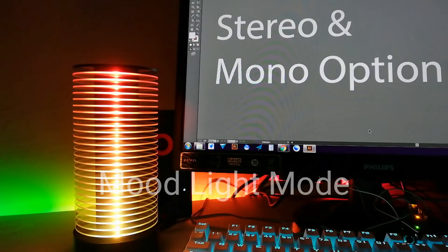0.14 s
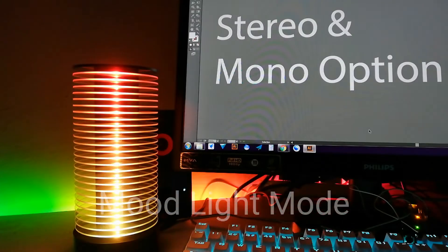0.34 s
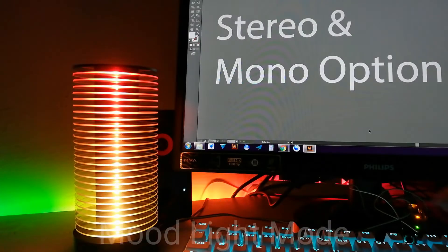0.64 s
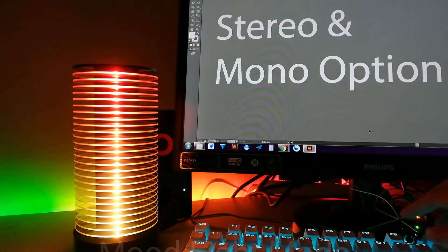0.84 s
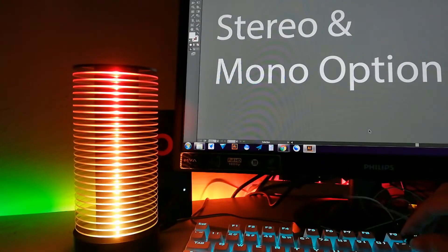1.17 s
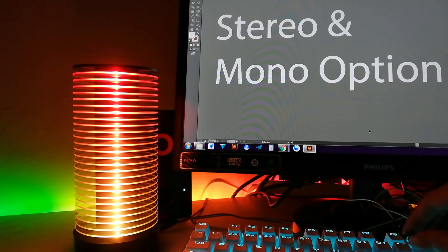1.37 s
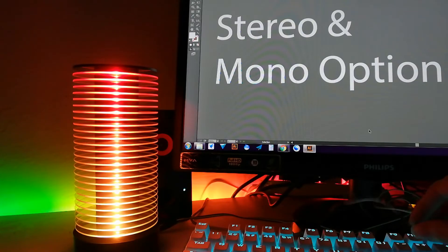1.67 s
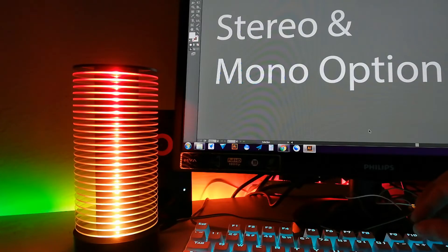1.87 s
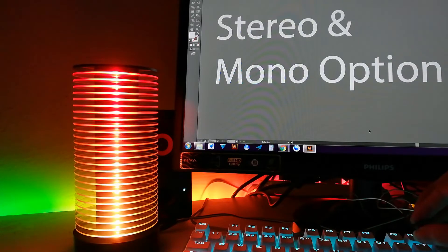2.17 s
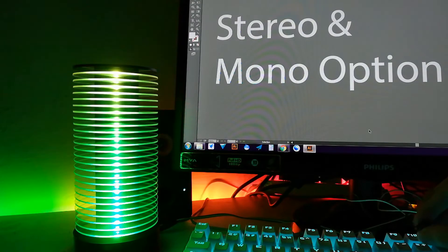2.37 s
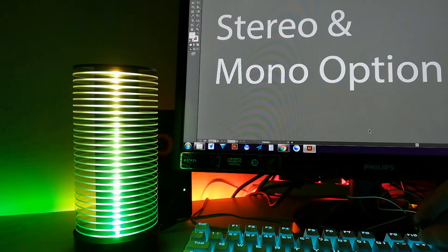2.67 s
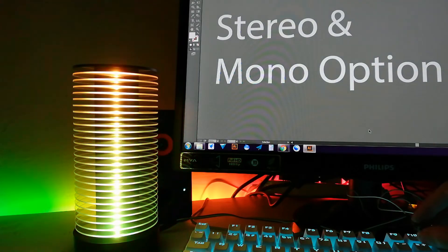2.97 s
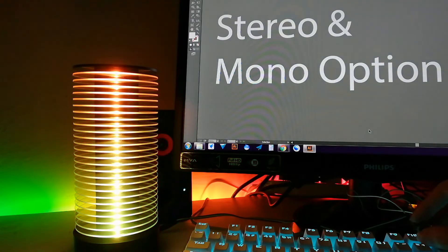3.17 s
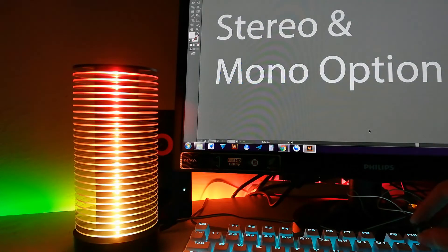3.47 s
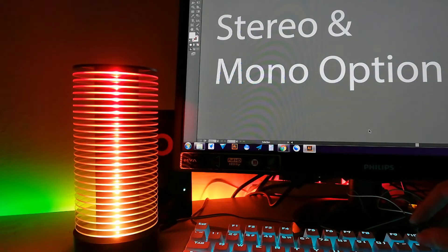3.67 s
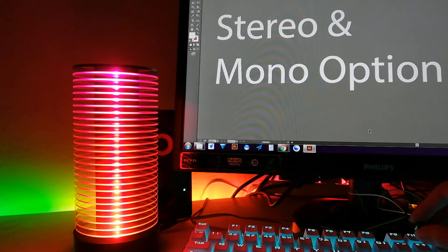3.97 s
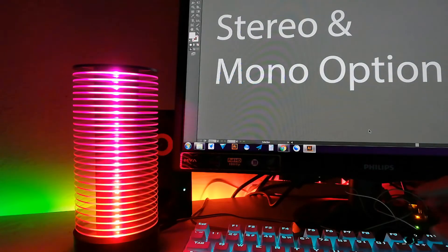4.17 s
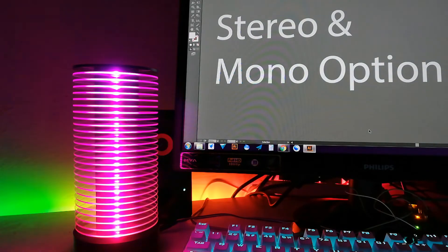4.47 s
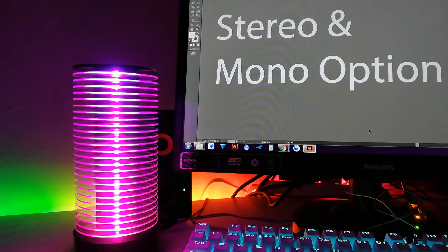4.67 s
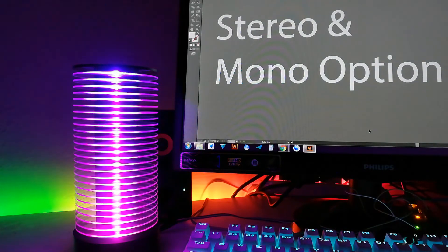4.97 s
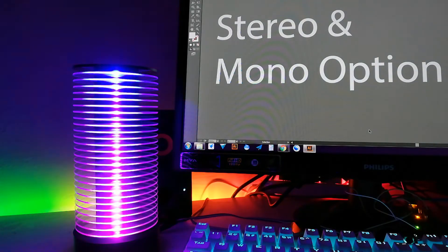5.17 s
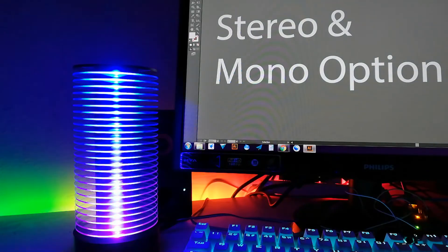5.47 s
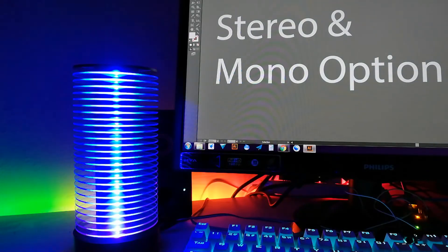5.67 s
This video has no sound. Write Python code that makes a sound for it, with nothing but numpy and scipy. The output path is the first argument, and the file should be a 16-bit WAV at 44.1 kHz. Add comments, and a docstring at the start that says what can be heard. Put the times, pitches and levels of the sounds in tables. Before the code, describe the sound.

Quiet desk room with soft hiss and faint mains hum; a deep drone swells and sinks as small switches click, then a soft scrape and knock.

```python
"""Soft hiss comes first, with room rumble and a faint mains hum: a quiet room at night, near a desk, in spaced microphones.
A deep drone, perhaps a vehicle outside, swells and sinks: one gliding sine. A finger slides over plastic (grainy noise)
and a hand clicks small switches on the desk (ringing springs and housings); one dull pop is a step that sags back.
Near the end furniture scrapes softly (chattering tones and friction noise) and a knock follows (ringing desk modes).
Echoes and a short room tail surround the finger, the switches and the raps of the knock."""
import sys
import numpy as np
from scipy import signal
from scipy.fft import rfft, irfft
from scipy.io import wavfile
from scipy.ndimage import uniform_filter1d

SR = 44100
rng = np.random.default_rng(int(sys.argv[2]) if len(sys.argv) > 2 else 0)


def master_out(mix):
    """Clip the mix to full scale and print it as 16-bit PCM to the path in sys.argv[1]."""
    frames = np.transpose(np.atleast_2d(mix))
    ceiling = np.clip(frames, -1, 1)
    pcm = np.round(ceiling * 32767).astype(np.int16)
    wavfile.write(sys.argv[1], SR, pcm)


N = 257544  # length in samples

# Spectrum shape of room air and microphone hiss: pitch_hz, relative level_db
AIR_SPECTRUM = [(20, -42), (32, -8), (40, -2), (60, -5.5), (80, 1.5), (100, -16.5), (128, -11.5),
                (150, -16.5), (278, -19), (432, -27), (2140, -38.5), (10300, -46), (14700, -50),
                (16000, -58)]
AIR_RMS_DB = -51  # mean of the two microphones
# Likeness of the air at the two microphones: pitch_hz, likeness (-1 to 1)
AIR_LIKENESS = [(60, 0.99), (92, 1), (140, 0.94), (210, 0.91), (330, 0.65), (500, -0.11), (770, -0.44),
                (1170, 0.28), (1790, -0.065), (2740, -0.1), (4190, -0.093), (6410, -0.24), (9810, 0.074),
                (15000, -0.08)]
# Balance of the air: pitch_hz, left_minus_right_db
AIR_BALANCE = [(100, 0), (300, 0), (900, -2.5), (3000, -0.2), (8000, 0)]
# Standing waves stirred by the rumble: pitch_hz, width_hz of each of two passes, rms_db
ROOM_MODES = [(44.2, 3.9, -54), (73.7, 17, -65.5)]
# Mains tones: pitch_hz, rms_db
HUM_TONES = [(120, -63), (235, -81), (300, -75)]
# Path of the deep drone: time_s, pitch_hz, rms_db (before the fade at both ends)
DRONE_PATH = [(0.75, 47.65, -51.5), (1.02, 48.78, -43.5), (1.16, 50.66, -41.5), (1.22, 50.5, -53),
              (1.289, 49.2, -37), (1.37, 52.5, -44), (1.43, 50.6, -33), (1.7, 45.8, -36),
              (1.83, 45.75, -36), (2.01, 45.1, -32), (2.46, 46.6, -42.5), (2.72, 45.8, -58),
              (2.93, 45.33, -40), (3.1, 45, -76)]

# Finger strokes on the plastic: firmest_s, level_db of the grainy rub
FINGER_STROKES = [(1.09, -69), (1.119, -66.5), (1.155, -78), (1.178, -71), (1.36, -69)]
FINGER_RISE_DB_PER_S, FINGER_FALL_DB_PER_S = 403, 149
# Switch clicks: start_s, snap_peak_db, snap_pitch_hz, snap_breadth (multiple), low_side_ring_db and
# high_side_ring_db (against the snap), rattle_peak_db, rattle_tilt_db_per_octave, rattle_decay_ms,
# housing_pitch (multiple, by how it is held); peaks are before balance and room
CLICKS = [(1.0832, -58, 9000, 1.01, -15, -15, -47, -5, 2.5, 1.04),
          (1.093, -62, 9000, 1.01, -15, -15, -48, -2, 2.5, 1.07),
          (1.1261, -31.5, 10000, 1.01, -18, 4.5, -39, 13, 2.3, 0.99),
          (1.128, -55, 9000, 1.01, -15, -10, -33, -21, 0.8, 1.04),
          (1.139, -52, 8200, 1.01, -10, -10, -40.5, -15, 2, 1.06),
          (1.147, -53, 8200, 1.01, -10, -10, -48, -8, 2.5, 1.27),
          (1.182, -62, 9000, 1.01, -10, -10, -51, -8, 3, 1.02),
          (1.1874, -62, 9000, 1.01, -10, -10, -49, -13, 2.5, 1.25),
          (1.2007, -31.5, 9060, 0.9, -27, -18, -42.5, 1.5, 1.5, 1.17),
          (1.2248, -42, 8500, 1.01, -8, -14, -51, 5, 4, 0.85),
          (1.34, -49.5, 8400, 1.01, -10, -20, -70, 0, 3.8, 0.95),
          (1.3525, -43, 7700, 1.01, -4, -20, -45.5, -13, 4.5, 1.27),
          (1.756, -29.5, 9250, 1.3, -16, 3, -56, 6, 3.5, 1.2),
          (2.2954, -8, 9460, 0.9, -10.5, -13, -65, 0, 3, 0.72),
          (2.473, -22, 7310, 1.01, 0.5, 2, -59, 0, 3, 0.927),
          (3.709, -48, 10000, 1.01, -8, -8, -64, -7, 3.7, 0.98),
          (4.113, -56, 7000, 1.01, -8, -15, -67, 0, 3, 1.01),
          (4.153, -28, 9500, 1.01, -8, -8, -28, 11, 3, 1.07),
          (4.156, -10.5, 9540, 1.3, -1.5, -22, -33.5, 5, 6, 1.03),
          (4.1595, -29, 8400, 1.3, -6, -22, -32.5, -8, 9, 1.035),
          (4.193, -42, 8700, 1.4, -5, -20, -37, -3, 3.5, 1.11)]
# Modes of the switch spring: pitch (multiple of snap pitch), width_hz (before breadth), level_db
SPRING = [(1, 1850, 12.5), (1.13, 2000, 3.5), (.82, 870, -7)]
# Rings of the switch cap: pitch_hz, width_hz
CAP_RINGS = [(6400, 840), (13500, 1100)]
# Modes of the plastic housing, before tilt and hold: pitch_hz, width_hz, level_db
HOUSING = [(1155, 360, 8), (1530, 500, -1), (1870, 810, 0), (2290, 830, 0), (2650, 750, 5), (3350, 980, 0),
           (4170, 1300, -14)]
# Colour of the switches between the microphones: pitch_hz, left_minus_right_db
SWITCH_BALANCE = [(1500, 0), (3500, -5), (6500, 0), (9300, -4), (10800, 10), (12300, -7.5), (14000, -3)]
# Dull pop: start_s, peak_db
POP = (1.4303, -33)

# Soft scrape: full_from_s, full_until_s, reference level_db
SCRAPE = (5.365, 5.53, -55.5)
SCRAPE_RISE_DB_PER_S, SCRAPE_SAG_DB_PER_S, SCRAPE_FALL_DB_PER_S = 320, 13, 300
# Notes on which the leg chatters: pitch_hz, level_db against the scrape
SCRAPE_NOTES = [(170, -2), (235, 2), (272, -8)]
# The leg catches for a moment: centre_s, half_length_s, level_db
SCRAPE_HITCH = (5.447, 0.008, -5)
# Friction noise in the furniture: pitch_hz, width_hz, level_db against the scrape, fading_db_per_s
SCRAPE_BODY = [(143, 69, -2, 0), (416, 67, -11, 28), (530, 39, -13, 45), (772, 68, -11.5, 68),
               (1014, 110, -12.5, 76), (1240, 130, -19, 80), (1580, 330, -17, 80), (3460, 1100, -22, 70),
               (9500, 2500, -21, 60)]
# Knocks on the desk: start_s, rap_peak_db, blow_decay_ms, thump_peak_db, rap left_minus_right_db
# (peaks are before balance and room)
KNOCKS = [(5.782, -41, 5.1, -45.5, -6), (5.8226, -29.5, 4.1, -27, -10)]
# Modes of the desk: pitch_hz, width_hz, level_db
DESK = [(255, 66, -8.5), (423, 310, 1.5), (610, 220, 1.5), (748, 170, 1), (1060, 350, -7), (1480, 590, -15),
        (1910, 270, -6.5), (3080, 1000, -6), (4750, 2100, -14), (6500, 2700, -6), (9400, 2000, -2)]
# Flexing of the whole desk top: pitch_hz, width_hz, level_db
DESK_FLEX = [(119, 70, 0)]

# Echoes from desk, screen and walls: delay_ms, left_db, right_db
ECHOES = [(1.2, -7, -9), (3, -13, -14), (11.3, -16.5, -15.5), (18.5, -19, -18)]
# Room tail: pitch_hz, t60_s, colour_db
ROOM_DECAY = [(400, 0.35, -1), (1220, 0.22, 3.5), (1600, 0.34, 1), (2290, 0.35, 0), (3300, 0.19, 6.5),
              (4300, 0.35, 2), (5250, 0.35, -3.5), (6900, 0.22, 1.5), (8500, 0.36, -5), (10000, 0.26, 0),
              (11500, 0.3, -4.5), (13500, 0.33, -10), (15500, 0.17, -15)]
EDGE_HZ = 16300  # upper band limit of the recorder


def gain_of(db):
    """Decibels to a factor."""
    return 10 ** (np.asarray(db) / 20)


def evened(x):
    """Scales to rms 1."""
    return x / np.sqrt(np.mean(x ** 2) + 1e-20)


def read(points, hz):
    """Reads a table on a log-frequency axis."""
    f, value = np.transpose(points)
    return np.interp(np.log(hz + 1), np.log(f + 1), value)


def resonate(x, hz, width):
    """A fixed two-pole resonance."""
    r = np.exp(-np.pi * width / SR)
    return signal.lfilter([1, 0, -r], [1, -2 * r * np.cos(2 * np.pi * hz / SR), r * r], x)


def resonate_twice(x, hz, width):
    """Two equal resonances in a row, for steeper sides."""
    return resonate(resonate(x, hz, width), hz, width)


def sine(cycles):
    """A sine of rms 1 from its running count of cycles."""
    return np.sqrt(2) * np.sin(2 * np.pi * cycles)


def ring(modes, drive):
    """A drive, one for all or one row for each, rings a set of steep-sided modes; peak 1."""
    sound = 0
    pushes = np.broadcast_to(drive, (len(modes), drive.shape[-1]))
    for (hz, width, db), push in zip(modes, pushes):
        mode = resonate_twice(push, hz, width)
        sound = sound + gain_of(db) * mode / abs(mode).max()
    return sound / abs(sound).max()


def tilted(modes, db_per_octave):
    """Brightens or dulls a set of modes about its loudest one."""
    centre = max(modes, key=lambda mode: mode[2])[0]
    return [(hz, width, db + db_per_octave * np.log2(hz / centre)) for hz, width, db in modes]


def place(mix, s, sound, pan_db):
    """Returns the mix with the sound put in at time s; pan_db is left minus right."""
    at = round(s * SR)
    laid = np.zeros(N)
    laid[at:at + len(sound)] = sound[:N - at]
    return mix + laid * gain_of([[pan_db / 2], [-pan_db / 2]])


def air(patchy_db=1.28):
    """Hiss from random short-time spectra, most alike at the two microphones in the bass."""
    frames, hz = N // 1024 + 5, np.fft.rfftfreq(4096, 1 / SR)
    a, b, c, d, patches = rng.standard_normal((frames, 2049, 5)).T
    # neighbouring pitches and moments swell together
    patches = uniform_filter1d(patches, size=40, axis=0)
    patches = evened(uniform_filter1d(patches, size=4, axis=1))
    same = np.clip(read(AIR_LIKENESS, hz), -1, 1)[:, None]
    left = a + 1j * b
    right = same * left + np.sqrt(1 - same ** 2) * (c + 1j * d)
    z = np.array([left, right])
    colour = gain_of(read(AIR_SPECTRUM, hz)[:, None] + patchy_db * patches)
    z *= colour / np.sqrt((1 + same) / 2 + 0.39)
    z *= gain_of(np.array([.5, -.5])[:, None, None] * read(AIR_BALANCE, hz)[:, None])
    out = signal.istft(z, nperseg=4096, noverlap=3072)[1][:, :N]
    return gain_of(AIR_RMS_DB) * out / out.mean(0).std()


def rumble():
    """Low noise swells and fades in the standing waves of the room."""
    return sum(gain_of(db) * evened(resonate_twice(rng.standard_normal(N), hz, width))
               for hz, width, db in ROOM_MODES)


def hum():
    """Steady mains tones, each a sine from a random phase."""
    t = np.arange(N) / SR
    return sum(gain_of(db) * sine(hz * t + rng.random()) for hz, db in HUM_TONES)


def drone():
    """One low tone wavers in pitch and level, ending lower than it began."""
    s, hz, db = np.transpose(DRONE_PATH)
    t = np.arange(N) / SR
    fade = np.clip(np.minimum(t - s[0], s[-1] - t) / 0.074, 0, 1)
    level = fade * gain_of(np.interp(t, s, db))
    return level * sine(np.cumsum(np.interp(t, s, hz)) / SR)


def finger(grain_db=4, hiss_db=-3):
    """Skin catches and slips on the housing: grainy noise in its modes, with a thin hiss."""
    t = np.arange(1, 1.5, 1 / SR)
    press = 0
    for s, db in FINGER_STROKES:
        drop_db = np.where(t < s, FINGER_RISE_DB_PER_S * (s - t), FINGER_FALL_DB_PER_S * (t - s))
        press = press + gain_of(db - drop_db)
    grains = gain_of(grain_db * evened(uniform_filter1d(rng.standard_normal(len(t)), size=200)))
    slips = grains * rng.standard_normal((len(HOUSING), len(t)))
    hiss = evened(ring([(9000, 7600, 0)], slips[0]))
    rub = evened(ring(tilted(HOUSING, -2.5), slips)) + gain_of(hiss_db) * hiss
    return place(np.zeros((2, N)), t[0], press * rub, -1)


def switches():
    """A spring snaps with a thin bright tick; the plastic housing rattles briefly under it."""
    mix, t = np.zeros((2, N)), np.arange(3000) / SR
    shakes = np.sign(rng.standard_normal((len(CLICKS), len(HOUSING), len(t))))
    thin = signal.butter(6, 5000, "high", fs=SR, output="sos")  # so small a spring radiates no low sound
    small = signal.butter(4, 1030, "high", fs=SR, output="sos")  # nor does the housing reach the low mids
    push = signal.sosfilt(thin, 1. * (t == 0))
    for click, shake in zip(CLICKS, shakes):
        s, db, hz, breadth, low_db, high_db, rattle_db, tilt_db, ms, held = click
        spring = [(k * hz, breadth * width, level) for k, width, level in SPRING]
        cap = [(*CAP_RINGS[0], low_db), (*CAP_RINGS[1], high_db)]
        snap = ring(spring + cap, push)
        housing = [(held * f, width, level) for f, width, level in tilted(HOUSING, tilt_db)]
        jolts = np.diff(shake * np.exp(-1000 * t / ms), prepend=0)
        rattle = ring(housing, signal.sosfilt(small, jolts))
        mix = place(mix, s, gain_of(db) * snap + gain_of(rattle_db) * rattle, 0)
    return shaded(mix)


def shaded(x):
    """The two microphones hear the switches with different colour."""
    lean_db = read(SWITCH_BALANCE, np.fft.rfftfreq(N, 1 / SR))
    return irfft(rfft(x) * gain_of(np.array([[.5], [-.5]]) * lean_db), N)


def pop():
    """A sudden step in the signal sags back through zero within a few milliseconds."""
    s, db = POP
    t = np.arange(2000) / SR
    step = (1 - t / 0.0026) * np.exp(-t / 0.0057)
    return place(np.zeros((2, N)), s, gain_of(db) * step, 0)


def scrape():
    """A piece of furniture shifts: low chattering notes and uneven friction noise in its body."""
    full, until, db = SCRAPE
    hitch_s, hitch_half_s, hitch_db = SCRAPE_HITCH
    t = np.arange(-.15, until - full + .2, 1 / SR)  # zero where the scrape is full
    # seconds still to rise, seconds held, seconds since the fall began
    rise, hold, fall = np.maximum(-t, 0), np.clip(t, 0, until - full), np.maximum(t - until + full, 0)
    uneven_db = 2.2 * evened(uniform_filter1d(rng.standard_normal(len(t)), size=900))
    rub = rng.standard_normal(len(t)) * gain_of(uneven_db)
    notes = sum(gain_of(level) * sine(hz * t + rng.random()) for hz, level in SCRAPE_NOTES)
    catch_db = hitch_db * np.exp(-((t + full - hitch_s) / hitch_half_s) ** 2)
    notes *= gain_of(catch_db - 460 * rise)  # the notes rise more steeply than the friction
    body = sum(gain_of(level - fading_db * hold) * evened(resonate_twice(rub, hz, width))
               for hz, width, level, fading_db in SCRAPE_BODY)
    stroke = gain_of(db - SCRAPE_RISE_DB_PER_S * rise - SCRAPE_SAG_DB_PER_S * hold - SCRAPE_FALL_DB_PER_S * fall)
    return place(np.zeros((2, N)), full + t[0], stroke * (notes + body), -4.5)


def knocks():
    """Dull blows rap the desk top; its low thump follows and reaches both microphones alike and dry."""
    raps, thumps, t = np.zeros((2, N)), np.zeros((2, N)), np.arange(4000) / SR
    impulse = 1. * (t == 0)
    blows = rng.standard_normal((len(KNOCKS), len(DESK), len(t)))
    for (s, db, ms, thump_db, pan_db), blow in zip(KNOCKS, blows):
        rap = ring(DESK, 6 * impulse + blow * np.exp(-1000 * t / ms))
        raps = place(raps, s, gain_of(db) * rap, pan_db)
        thumps = place(thumps, s + 0.0057, -gain_of(thump_db) * ring(DESK_FLEX, impulse), 0)
    return raps, thumps


def room(x, tail_db=-7, smear_ms=1.0):
    """Echoes smeared by the clutter of near surfaces, over sparse random taps dying band by band."""
    taps = np.zeros((2, SR // 2))
    # one tap of random sign in every 20 samples
    at = np.arange(100, SR // 2 - 20, 20) + rng.integers(0, 20, (2, (SR // 2 - 101) // 20))
    np.put_along_axis(taps, at, rng.choice([-1., 1.], at.shape), 1)
    hz, t, z = signal.stft(taps, SR, nperseg=256)
    t60, colour_db = (read(np.array(ROOM_DECAY)[:, [0, k]], hz)[:, None] for k in (1, 2))
    tail = signal.istft(z * gain_of(colour_db - 60 * t / t60), SR, nperseg=256)[1]
    tail *= gain_of(tail_db) / np.linalg.norm(tail[0])
    smear = np.exp(-np.arange(200) / (smear_ms * SR / 1000))
    clutter = rng.choice([-1., 1.], (len(ECHOES), 2, 200)) * smear
    clutter /= np.linalg.norm(clutter, axis=2, keepdims=True)
    for (ms, *db), burst in zip(ECHOES, clutter):
        start = round(ms * SR / 1000)
        tail[:, start:start + 200] += gain_of(db)[:, None] * burst
    return signal.fftconvolve(x, tail, axes=1)[:, :N]


def scene():
    """Near sounds with their room, over the background; rumble, hum and drone are equal at both microphones."""
    near = finger() + switches()
    near[0] = np.roll(near[0], 6)  # they lie to the right: sound reaches the left microphone later
    raps, thumps = knocks()
    raps[0] = np.pad(raps[0], (26, 0))[:N]  # the knocks lie further right still
    near += raps
    background = air() + rumble() + hum() + drone()
    return near + room(near) + thumps + scrape() + pop() + background


def record(dry):
    """The band limit of the recorder: a steep low-pass filter."""
    low_pass = signal.firwin(511, EDGE_HZ, window=("kaiser", 9), fs=SR)
    return signal.oaconvolve(dry, low_pass[None], "same")


dry = scene()
out = record(dry)
master_out(out)
```